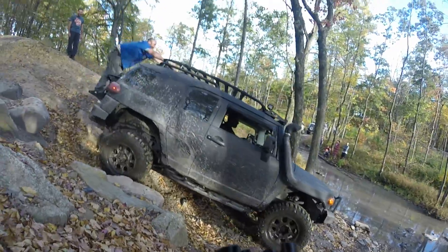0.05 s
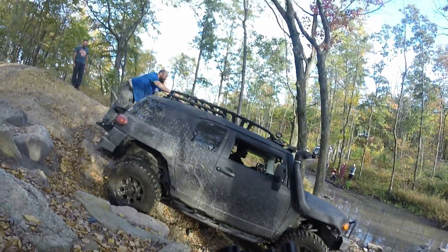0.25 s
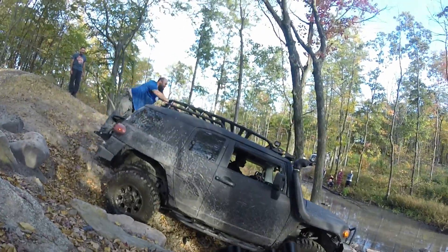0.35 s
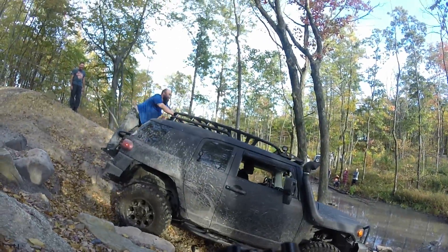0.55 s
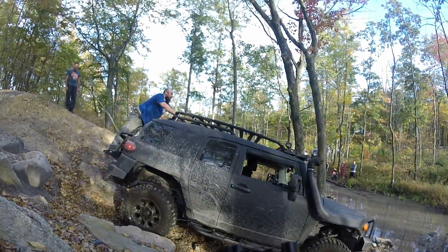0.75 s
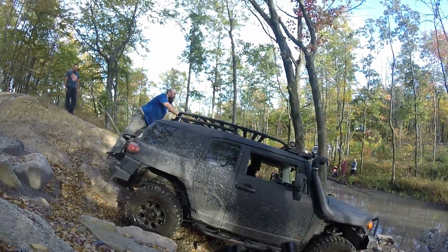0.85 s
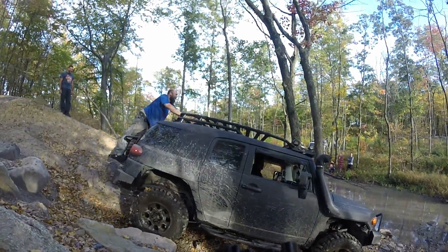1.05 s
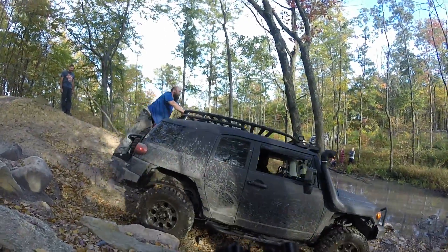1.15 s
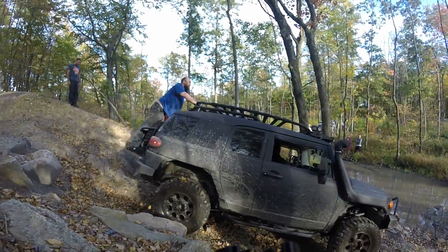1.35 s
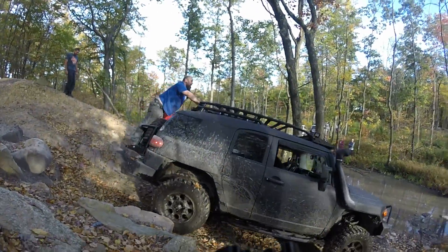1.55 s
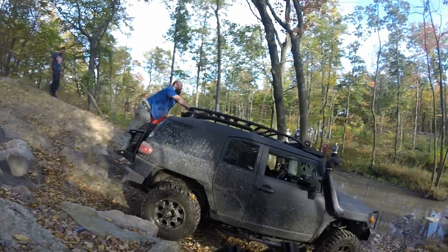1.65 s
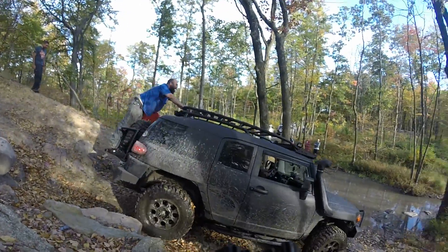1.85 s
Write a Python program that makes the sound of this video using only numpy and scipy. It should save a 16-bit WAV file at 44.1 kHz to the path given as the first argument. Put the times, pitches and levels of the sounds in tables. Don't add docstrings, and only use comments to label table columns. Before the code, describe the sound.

A camera's plastic casing is bumped, knocked sharply, rubbed and tapped, with a distant engine murmuring outdoors

```python
import sys
import numpy as np
from scipy import signal
from scipy.fft import rfft, irfft, next_fast_len
from scipy.io import wavfile
from scipy.ndimage import uniform_filter1d, map_coordinates

SR = 44100
rng = np.random.default_rng(int(sys.argv[2]) if len(sys.argv) > 2 else 0)


def to_wav(s):
    ch = np.atleast_2d(s).T
    pcm = np.round(np.clip(ch, -1, 1) * 32767)
    wavfile.write(sys.argv[1], SR, pcm.astype(np.int16))


def ratio(d):
    e = np.asarray(d, float) / 20
    return 10 ** e


N = 83790
KNOCK_S = .40934
TOP_HZ = 15300


def unit(x):
    return x / np.sqrt(np.mean(x ** 2) + 1e-20)


def filtered(x, response):
    m = next_fast_len(N + 8192)
    return irfft(rfft(x, m) * response(np.fft.rfftfreq(m, 1 / SR)), m)[:N]


def colour(points):
    f, v = np.transpose(points)
    return lambda hz: ratio(np.interp(np.log(hz + 1), np.log(f + 1), v, left=-80, right=-80))


def resonances(rows, floor_db):
    def gain(f):
        power = ratio(2 * floor_db)
        for hz, width, db in rows:
            power = power + ratio(2 * db) / (1 + (2 * (f - hz) / width) ** 2) ** 2
        return np.sqrt(power) * (f > 600)
    return gain


def below(top_hz):
    return lambda hz: 1 / np.sqrt(1 + (hz / top_hz) ** 12)


def curve(rows):
    s, v = np.transpose(rows)
    return np.interp(np.arange(N) / SR, s, v)


def wobble(rate):
    knots = rng.standard_normal(int(N * rate / SR) + 4)
    return map_coordinates(knots, [np.arange(N) * rate / SR])


def patchy(x, patch_db):
    z = signal.stft(x, nperseg=128)[2]
    field = uniform_filter1d(rng.standard_normal(z.shape), size=4, axis=0)
    field = uniform_filter1d(field, size=3, axis=1)
    return signal.istft(z * ratio(patch_db * unit(field)), nperseg=128)[1][:N]


def ring(hz, db, t60, rise):
    t = np.arange(SR // 4) / SR
    return ratio(db - 60 * t / t60) * np.sin(2 * np.pi * hz * t) * (1 - np.exp(-t / rise)) ** 2


def modes(rows, rise):
    return sum(ring(hz, db, t60, rise) for hz, db, t60 in rows)


def crack(db, t60):
    t = np.arange(SR // 4) / SR
    return ratio(db - 60 * t / t60) * rng.standard_normal(len(t))


def add(out, s, x):
    part = out[round(s * SR):][:len(x)]
    part += x[:len(part)]


def brushing(strokes, bands):
    t, shape = np.arange(N) / SR, np.zeros(N)
    for start, rise, hold, fall, db in strokes:
        shape += ratio(db) * np.interp(t, np.cumsum([start, rise, hold, fall]), [0, 1, 1, 0])
    hiss = rng.standard_normal(N) * ratio(1.2 * wobble(90))
    return shape * unit(filtered(hiss, resonances(bands, floor_db=-31)))


def air():
    # frequency in Hz, spectral level in dB per Hz.
    air_spectrum = [(180, -21), (300, -3), (763, -10.5), (1700, -7), (2100, -13), (3300, -15.5),
                    (5000, -20), (11500, -32), (15000, -39.5)]
    level_db, swell_db = -58.5, .8
    murmur = patchy(rng.standard_normal(N), 1.5)
    return ratio(level_db + swell_db * wobble(6.22)) * unit(filtered(murmur, colour(air_spectrum)))


def rumble():
    # frequency in Hz, spectral level in dB per Hz.
    rumble_spectrum = [(8, 12), (18, -0.5), (45, -2), (140, -9.5), (215, -11), (300, -23), (600, -27),
                       (1000, -29)]
    # time in seconds, level in dB.
    shake_levels = [(0.0, -49), (0.268, -41.5), (0.438, -51.5), (0.698, -50), (0.824, -46), (1.264, -50.5),
                    (1.45, -48.5), (1.602, -50), (1.9, -46)]
    lump_db, lumps_per_s = 1.5, 30
    lumps = rng.standard_normal(N) * ratio(lump_db * wobble(lumps_per_s))
    return ratio(curve(shake_levels) - 1.0) * unit(filtered(lumps, colour(rumble_spectrum)))


def bumps():
    # start in seconds, ring peak in dB, low push peak in dB, direction of the push (+1 or -1).
    contacts = [(.021, -37.5, -70, 1), (0.067, -43, -43, 1), (0.102, -40, -42, -1), (0.136, -28.5, -34, -1),
                (0.222, -38, -46, 1), (0.2471, -14.5, -28.5, 1), (0.271, -25.5, -30.5, 1),
                (.075, -58, -46, -1), (.19, -46, -50, 1), (0.354, -48.5, -40, -1), (.378, -59, -48, 1),
                (0.2898, -30.5, -59, 1), (0.488, -45, -40.5, 1), (0.569, -69, -47, -1),
                (0.696, -43.5, -35, -1), (0.756, -55, -43, -1), (0.845, -44.5, -69, 1),
                (.878, -45.5, -48, -1), (1.01, -44.5, -54, 1), (1.15, -73, -52, 1), (1.246, -69, -40, 1),
                (1.302, -41, -49.5, 1), (1.354, -37.5, -42, 1), (1.376, -64, -37, -1),
                (.79, -58.5, -54, -1), (.915, -55, -50, 1), (1.034, -53, -47, -1), (1.5, -60, -47, 1),
                (1.726, -44, -45, -1), (1.548, -64, -51, 1), (1.66, -69.5, -46, -1), (1.808, -43, -53, 1),
                (1.854, -34.5, -57.5, -1), (1.876, -37, -51, -1)]
    housing_hz, housing_scatter, housing_t60, housing_rise_s = 218.4, 0.0041, 0.12, 0.0031
    thud_hz, thud_db, thud_t60, thud_rise_s = 169.3, 11.5, 0.023, 0.0019
    push_hz, push_scatter, push_t60, push_rise_s = 43, 0.087, 0.058, 0.0015
    out = np.zeros(N)
    for s, ring_db, push_db, way in contacts:
        z = rng.standard_normal(2)
        body = ring(housing_hz * (1 + housing_scatter * z[0]), ring_db, housing_t60, housing_rise_s)
        thud = ring(thud_hz, ring_db + thud_db, thud_t60, thud_rise_s)
        push = ring(push_hz * (1 + push_scatter * z[1]), push_db + 8.0, push_t60, push_rise_s)
        add(out, s, np.sign(way) * (push - body - thud))
    return filtered(out, below(249))


def snaps():
    # start in seconds, peak in dB, spectral tilt in dB per octave.
    brittle_snaps = [(0.1181, -37, -3.5), (0.1556, -36.5, -6), (0.1631, -29, -1.5), (0.1631, -33.5, -0.5),
                     (.177, -47, -2), (.2175, -42, -3), (0.2491, -33, -2), (.258, -41, 1), (.265, -42, 1),
                     (.6975, -32.5, -6), (1.375, -40, 7), (1.426, -45, 1), (1.627, -38, 4), (1.643, -35, 8),
                     (1.651, -33, 4), (1.680, -40.5, 7), (1.685, -39, 6), (1.693, -37, 3),
                     (1.702, -43.5, 7), (1.741, -45, 2), (1.751, -46, 7), (1.765, -48, 2), (1.771, -37, 0),
                     (1.807, -41.5, -7)]
    # resonance in Hz, width in Hz, level in dB.
    shell_bands = [(2710, 1730, 2), (5960, 1200, -4), (7600, 970, -11), (9300, 880, -7), (10750, 1100, -10),
                   (13600, 1800, -17)]
    size, t60, pivot_hz = 1024, .009, 6000
    lead = size // 4
    hz, out = np.fft.rfftfreq(size, 1 / SR), np.zeros(N)
    shell = resonances(shell_bands, -24)(hz)
    for s, db, tilt_db in brittle_snaps:
        burst = np.roll(crack(db, t60)[:size], lead)
        tilt = ratio(tilt_db * np.log2((hz + 1) / pivot_hz))
        add(out, s - lead / SR, irfft(rfft(burst) * shell * tilt))
    return out


def cloth_brushes():
    # start, rise, hold and fall in seconds, level in dB.
    cloth_strokes = [
        (.15, 0.017, 0.01, 0.03, -57),
        (0.23, 0.015, 0.02, 0.019, -54.5),
        (.272, 0.011, 0.007, 0.11, -51),
        (0.507, 0.1, 0.13, 0.13, -57),
    ]
    # resonance in Hz, width in Hz, level in dB.
    cloth_bands = [(1650, 820, 4.5), (2600, 520, 9.5), (3450, 800, 4.5), (5460, 2300, -5.5)]
    return brushing(cloth_strokes, cloth_bands)


def ticks():
    # start in seconds, peak in dB, pitch in Hz, spread in octaves.
    dry_ticks = [(.163, -37.5, 2360, 0.5), (.170, -54, 4600, .1), (0.213, -47, 1280, 0.38),
                 (0.217, -39.5, 1570, 0.28), (0.25, -38, 1210, 0.87), (.272, -37, 1020, 0.84),
                 (.472, -38.5, 2250, 0.34), (0.493, -35, 2600, 0.15), (0.6966, -43.5, 995, 0.95),
                 (0.88, -48, 1380, 0.3), (0.9171, -44, 700, 0.89), (.937, -60, 612, 0.7)]
    cycles, t60_scale = 9.4, 0.01
    out = np.zeros(N)
    for s, db, hz, spread in dry_ticks:
        offsets = np.linspace(-1, 1, 4) + rng.uniform(-0.24, 0.32, 4)
        pitches = np.minimum(hz * 2 ** (spread * offsets), 15000)
        for k, f in enumerate(pitches):
            t60 = min(cycles / f, 3 * t60_scale) + t60_scale / 3
            add(out, s, (-1) ** k * ring(f, db, t60, .0001))
    return out


def glints():
    # start, rise, hold and fall in seconds, level in dB.
    glint_strokes = [
        (.245, .008, 0.062, .04, -66),
    ]
    # resonance in Hz, width in Hz, level in dB.
    upper_bands = [(6070, 810, 1), (8930, 1000, 3), (14200, 1400, -11)]
    return brushing(glint_strokes, upper_bands)


def knock():
    # frequency in Hz, level in dB, t60 in seconds.
    stiff_modes = [(2456, 2.8, .0057), (1142, -.5, .0037), (3559, -21.4, .0115)]
    opposed_modes = [(556, -11.2, .0048), (1714, -3.2, .0095), (1956, 2, .0047), (2887, -5.4, .0088),
                     (3768, -4.5, .0025)]
    # frequency in Hz, level in dB, t60 in seconds.
    crack_modes = [(4560, -33, 0.0086), (5220, -34, 0.007), (6600, -31.5, 0.0069)]
    # frequency in Hz, level in dB, t60 in seconds, direction (+1 or -1).
    after_modes = [(184, -35, 0.1, -1), (265, -38.5, 0.28, 1), (351, -37.5, 0.19, -1), (750, -36.5, .11, 1),
                   (1003, -42, .11, 1), (1166, -31, 0.073, 1), (1330, -28.5, 0.066, -1)]
    # frequency in Hz, gain of the crack in dB.
    crack_spectrum = [(300, -48), (2500, -9), (3800, 3), (5000, 8), (8000, 5.5), (12000, -5), (16500, -20)]
    # resonance in Hz, width in Hz, level in dB.
    rattle_bands = [(1200, 1200, -2), (2300, 1600, 0)]
    rise_s = .00044
    crack_db, crack_t60, crack_lag_s = -25.5, .008, .0004
    rattle_db, rattle_t60, rattle_lag_s = -27, .026, .002
    body, snap, tail = np.zeros((3, N))
    after = sum(np.sign(way) * ring(hz, db, t60, rise_s) for hz, db, t60, way in after_modes)
    add(body, KNOCK_S, modes(stiff_modes, rise_s) - modes(opposed_modes, rise_s) + after)
    add(snap, KNOCK_S + crack_lag_s, crack(crack_db, crack_t60) + modes(crack_modes, rise_s))
    add(tail, KNOCK_S + rattle_lag_s, crack(rattle_db, rattle_t60))
    snap = filtered(snap, colour(crack_spectrum))
    return body + snap + filtered(tail, resonances(rattle_bands, rattle_db))


def sheen():
    # start, rise, hold and fall in seconds, level in dB.
    sheen_strokes = [
        (.51, 0.073, 0.14, .12, -61),
    ]
    # resonance in Hz, width in Hz, level in dB.
    nap_bands = [(6820, 370, -2), (8040, 1400, -3.5), (9200, 760, -10), (10700, 930, -9.5)]
    return brushing(sheen_strokes, nap_bands)


def finger_drags():
    # start, rise, hold and fall in seconds, level in dB.
    drag_strokes = [
        (.73, 0.038, 0.037, 0.036, -64),
        (.82, 0.044, 0.023, .01, -64),
        (.876, 0.0036, 0.017, 0.039, -58),
    ]
    # resonance in Hz, width in Hz, level in dB.
    skin_bands = [(1360, 450, 2), (1740, 300, -3)]
    return brushing(drag_strokes, skin_bands)


def rub():
    # time in seconds, pressure in dB.
    pressure_points = [(.85, -72), (1.3, -66.5), (1.42, -52), (1.455, -48.5), (1.48, -41), (1.53, -43.5),
                       (1.55, -45.5), (1.58, -47.5), (1.6, -45), (1.635, -45.5), (1.65, -54.5),
                       (1.675, -57.5), (1.72, -59.5), (1.78, -58.5), (1.8, -67), (1.9, -60.5)]
    # resonance in Hz, width in Hz, level in dB.
    rub_bands = [(1670, 500, 3.5), (2840, 530, -0.5), (3380, 650, 4.5), (5540, 1200, -4), (7420, 950, -5.5),
                 (9200, 1300, -9), (10600, 830, -13), (13500, 2200, -33)]
    grains_per_s, grain_db, patch_db, floor_db = 12000, .6, 1.8, -18
    brightens = 0.18
    grains = (rng.random(N) < grains_per_s / SR) * rng.standard_normal(N)
    grains = grains * ratio(grain_db * rng.exponential(size=N))
    slips = patchy(unit(grains) + 0.8 * rng.standard_normal(N), patch_db)
    slips = slips * ratio(0.76 * wobble(120))
    slips = filtered(slips, lambda hz: hz < TOP_HZ)
    sound = unit(filtered(slips, resonances(rub_bands, floor_db)))
    treble = filtered(sound, lambda hz: np.clip((hz - 3800) / 1200, 0, 1))
    press_db = curve(pressure_points)
    treble_gain = ratio(brightens * (press_db - press_db.max()))
    return ratio(press_db) * (sound - treble + treble * treble_gain)


def taps():
    # start in seconds, peak in dB, housing ring relative to it in dB.
    nail_taps = [
        (1.3994, -22, -15.5),
        (1.5942, -24, -13.5),
        (1.8065, -23, -15),
    ]
    # frequency in Hz, level in dB, t60 in seconds.
    nail_modes = [(1320, 0, .0036), (2300, -20, .008)]
    opposed_nail_modes = [(1745, -3.5, .0115), (950, -13, .011)]
    rise_s = .00017
    body_hz, body_t60, body_rise_s = 215, 0.11, 0.00051
    out = np.zeros(N)
    shell = modes(nail_modes, rise_s) - modes(opposed_nail_modes, rise_s)
    for s, db, body_db in nail_taps:
        add(out, s, ratio(db) * (shell + ring(body_hz, body_db, body_t60, body_rise_s)))
    return out


def scene():
    background = air() + rumble()
    impacts = bumps() + snaps() + ticks() + knock() + taps()
    friction = cloth_brushes() + glints() + sheen() + finger_drags() + rub()
    return (background + impacts + friction)[None]


def low_pass(x):
    return signal.sosfilt(signal.butter(12, 16550, fs=SR, output="sos"), x)


def record(dry):
    duck_db, attack_s, recover_s = -7, .012, 0.3
    since = np.arange(N) / SR - KNOCK_S - .006
    onset = np.clip(since / attack_s, 0, 1)
    duck = ratio(duck_db * onset * np.exp(-np.maximum(since, 0) / recover_s))
    x = filtered(dry[0] * duck, lambda hz: ratio(-30 * np.clip((hz - TOP_HZ) / 150, 0, 1)))
    return low_pass(np.clip(x, -1, 1)[None])


dry = scene()
out = record(dry)
to_wav(out)
```